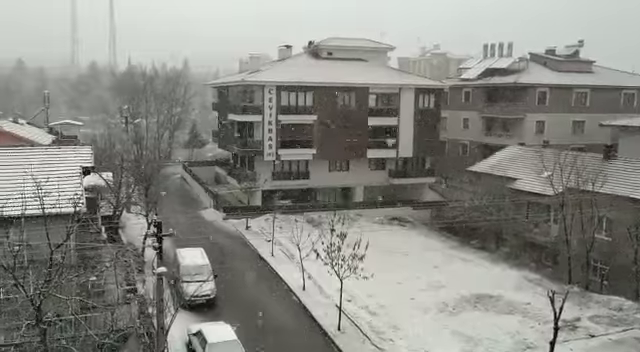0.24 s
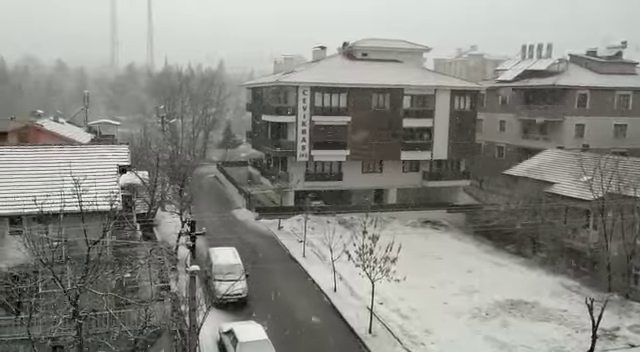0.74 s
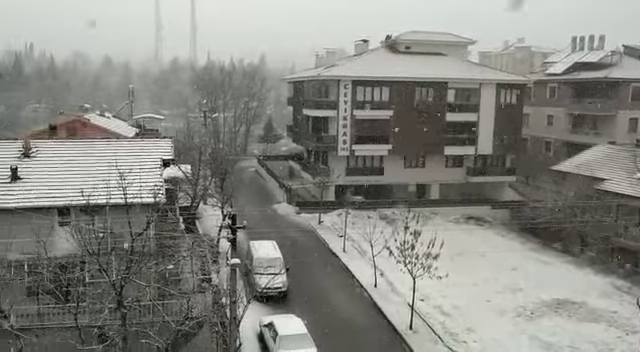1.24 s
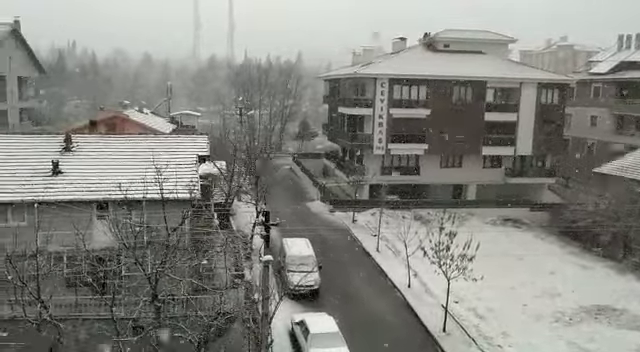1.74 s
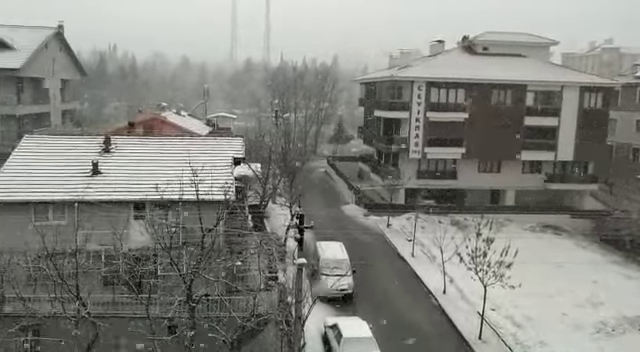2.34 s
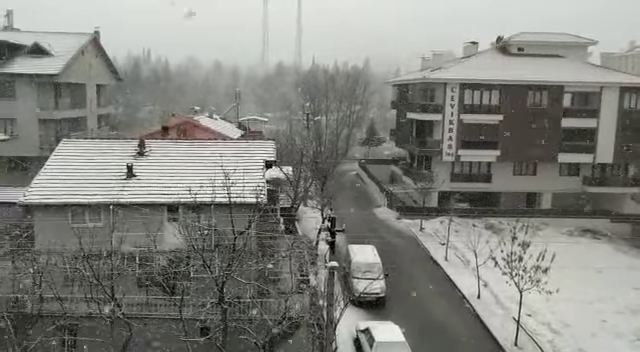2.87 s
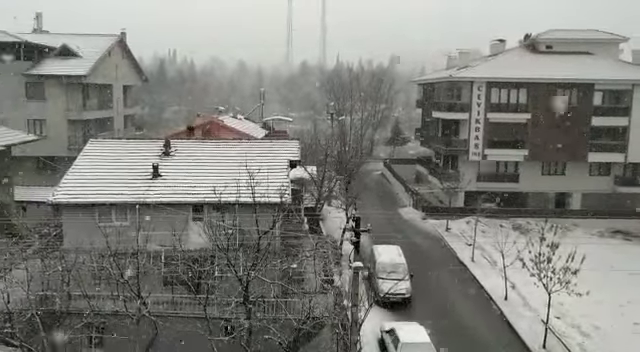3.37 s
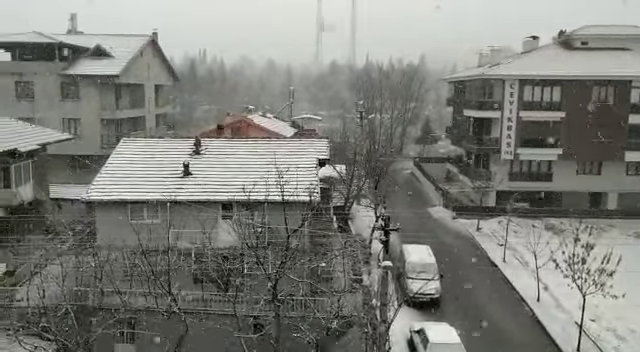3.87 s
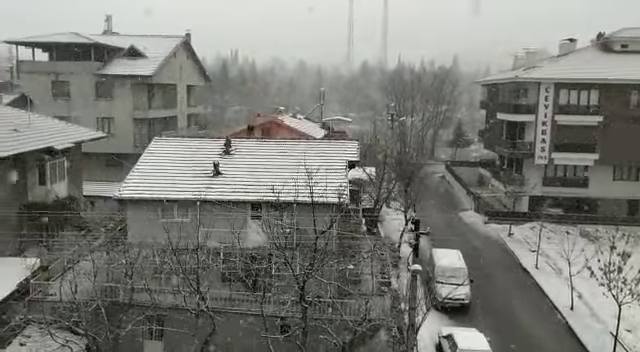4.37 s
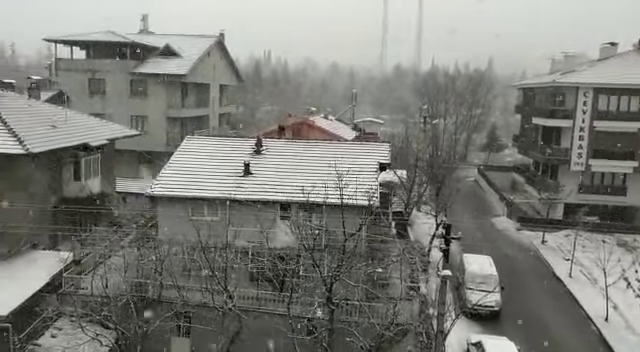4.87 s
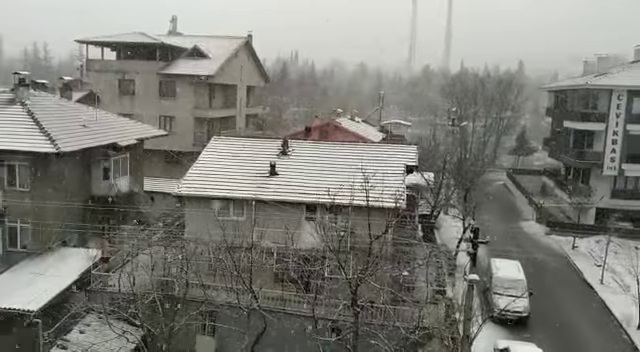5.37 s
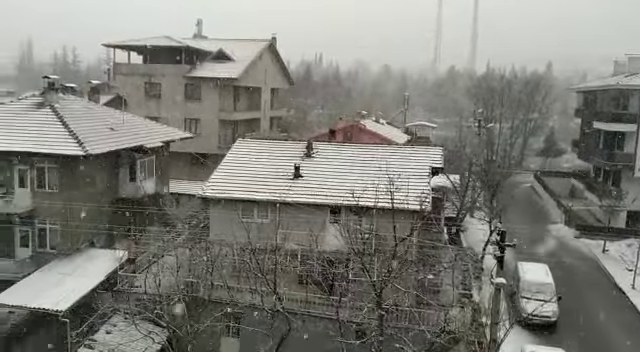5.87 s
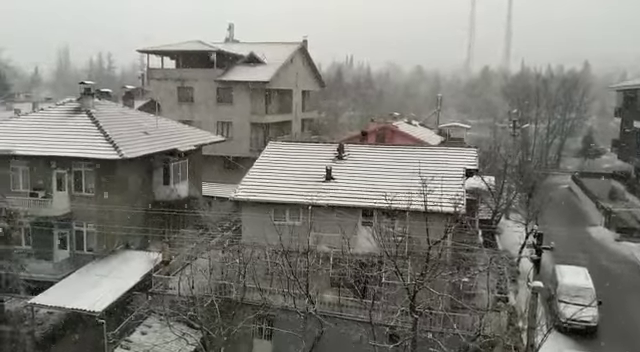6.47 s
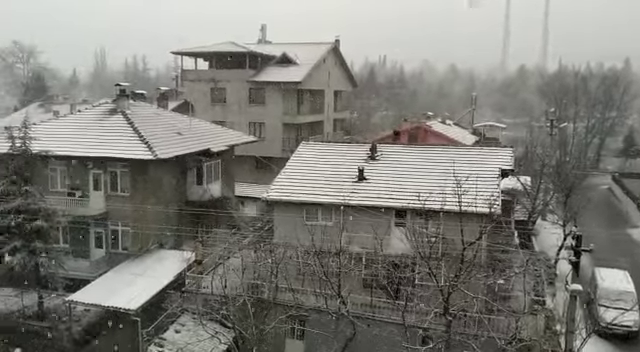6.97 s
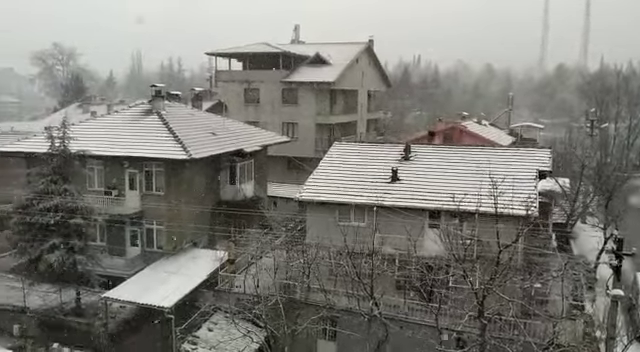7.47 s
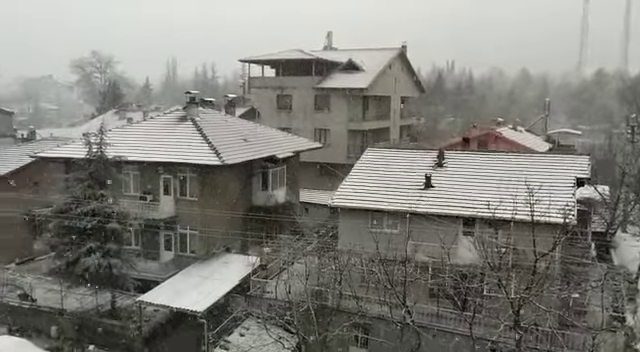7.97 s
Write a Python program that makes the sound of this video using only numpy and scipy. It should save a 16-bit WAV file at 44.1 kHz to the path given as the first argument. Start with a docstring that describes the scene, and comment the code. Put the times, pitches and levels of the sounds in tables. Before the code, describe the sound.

Wet tyre hiss and low engine boom swell as a car goes by below, then fade hollowly down a slushy residential street.

```python
"""First one hears the boom of an engine and the wet hiss of tyres: a car passes a balcony from left to right.
Harmonic engine orders follow the firing rate, which falls just after the car is abreast; filtered noise and
droplet ticks make the tyres, combed by wall echoes. Two ports of a phone hear them with a lag set by bearing.
As the car goes off between snowy houses its echo returns along the slushy street and hollows the hiss.
A second engine hums far off, a damped mode gives one dull knock, and light air rumbles at the ports."""
import sys
import numpy as np
from scipy import signal
from scipy.fft import rfft, irfft, next_fast_len
from scipy.io import wavfile
from scipy.ndimage import map_coordinates

SR = 44100
rng = np.random.default_rng(int(sys.argv[2]) if len(sys.argv) > 2 else 0)


def wav_out(sig):
    """Save sig, one row per channel (or a flat mono array), as 16-bit PCM at SR to the path in sys.argv[1]."""
    wavfile.write(sys.argv[1], SR, np.round(np.clip(np.atleast_2d(sig).T, -1, 1) * 32767).astype(np.int16))


N = 362061

# Engine speed, pulling and then coasting: (time [s], firing rate [Hz])
FIRING_RATE = [(0, 58.54), (.42, 63), (1.0, 75.66), (1.39, 80.26), (1.83, 80.16), (2.1, 77.4), (2.26, 71.9),
               (2.65, 59.5), (2.81, 52.47), (3.08, 50.24), (4.66, 52.63), (5.8, 52.05), (6.3, 50.4),
               (7.4, 48.1), (8.21, 43.55)]
# Exhaust boom before its waver: (time [s], level [dB])
BOOM_LEVEL = [(0, -27), (.9, -30), (1.03, -38.5), (1.13, -28.5), (1.35, -26.5), (1.45, -42), (1.95, -31.5),
              (2.45, -26.5), (3.35, -30), (4.85, -43.5), (5.3, -53.5), (5.8, -45.5), (6.15, -44.5),
              (6.8, -50), (7.3, -47), (8.21, -53)]
# Engine orders together, sinking while the throttle is shut: (time [s], level [dB])
OVERTONE_LEVEL = [(0, -47), (.65, -46), (1.0, -43.5), (1.7, -44.5), (2.1, -46), (2.3, -55), (2.95, -46),
                  (3.35, -41.5), (4.0, -45.5), (4.85, -47), (5.25, -54.5), (5.9, -57), (6.35, -51.5),
                  (6.9, -56), (7.4, -51.5), (8.21, -61)]
# Third order, droning at top revs, again as the revs fall, and more softly from 3.4 to 4.4 s:
# (time [s], level [dB])
DRONE_LEVEL = [(0, -66), (1.25, -62), (1.65, -58.5), (1.88, -46), (2.05, -62), (2.25, -47.5), (2.6, -47.5),
               (2.95, -67), (3.4, -53), (4.4, -53), (5.2, -66.5), (6.3, -56), (7.3, -62), (8.21, -71)]
# Orders other than the third, under load: (multiple of the firing rate [1], relative level [dB])
PULLING_ORDERS = [(.5, -5.5), (2, 2.5), (2.5, -17), (3.5, -19), (4, -8), (4.5, -30), (5, -17), (6, -18.5)]
# The same when cruising: (multiple of the firing rate [1], relative level [dB])
CRUISING_ORDERS = [(.5, -3), (2, 1.5), (4, -17), (6, -16)]
# Resonances that the orders sweep through: (centre [Hz], width [Hz], level [dB])
SILENCER_MODES = [(249, 23, 4.5), (381, 41, -3.5)]
# The driver lifts off: (start [s], end [s])
LIFT_OFF = (2.19, 3)
FADES_DB = 2.5  # the engine orders waver in level together


def engine(wobble=0.00088, boom_rough_db=2.0, far_rough_db=-1.0, rough_db=2.0):
    """Harmonic synthesis: exhaust pulses boom at the firing rate; unequal cylinders add half orders."""
    hz, = curves(FIRING_RATE)
    boom_db, = curves(BOOM_LEVEL)
    overtone_db, = curves(OVERTONE_LEVEL)
    drone_db, = curves(DRONE_LEVEL)
    load, = curves([(LIFT_OFF[0], 1), (LIFT_OFF[1], 0)])
    phase = 2 * np.pi * np.cumsum(hz * (1 + wobble * walk(10))) / SR

    orders = np.sqrt(2) * undb(drone_db) * np.sin(3 * phase)
    for table, share in ((PULLING_ORDERS, load), (CRUISING_ORDERS, 1 - load)):
        stack = np.zeros(N)
        for multiple, db in table:
            level = undb(db + rough_db * np.tanh(walk(9.8)))
            stack += level * np.sin(multiple * phase + 2 * np.pi * rng.random())
        orders = orders + np.sqrt(share) * unit(stack) * undb(overtone_db)
    orders = filtered(orders, silencer)

    # The boom wavers more when the car is far
    distance, _ = position()
    waver_db = far_rough_db * (1 - 1 / distance) * walk(3.24)
    boom = unit(np.sin(phase) * undb(boom_rough_db * walk(13)))
    return boom * undb(boom_db + waver_db) + orders * undb(FADES_DB * walk(7))


def silencer(f):
    """Resonance: each damped mode adds its peak to the direct transmission."""
    gain = 1
    for centre_hz, width_hz, db in SILENCER_MODES:
        gain = gain + undb(db) / (1 + 1j * (f ** 2 - centre_hz ** 2) / (f * width_hz))
    return gain


# Tyre spectra, from carcass rumble up to fine mist: (frequency [Hz], relative density [dB per Hz])
RUMBLE_SPECTRUM = [(15, 7.5), (35, 7), (70, 6.5), (120, -1.5), (250, 5), (330, -0.5), (450, -11), (700, -6),
                   (1500, -26)]
ROAR_SPECTRUM = [(200, -10.5), (420, -3), (650, -1), (850, 1.5), (1050, 6), (1350, 2.5), (1800, -12),
                 (3500, -20.5)]
SWISH_SPECTRUM = [(800, -23), (1200, -2.5), (1500, 1.1), (2000, 3), (2800, 1.5), (3400, 3), (4500, -1.5),
                  (6000, -5.5), (9000, -25)]
SPRAY_SPECTRUM = [(1500, -23), (3000, -12.5), (4500, -3.5), (6200, 3.5), (8700, 3), (9400, 1.5),
                  (10200, -5.5), (11000, -15), (14000, -50)]
MIST_SPECTRUM = [(3000, -10), (7000, 6), (10000, 10), (11500, 7.5), (13000, 5), (14500, -10.5)]
# How each carries: (level abreast [dB], loss per doubling of distance [dB],
# gain straight behind and equal loss straight ahead [dB])
RUMBLE_REACH = (-42, 5.3, -3.5)
ROAR_REACH = (-43.5, 3.1, 3)
SWISH_REACH = (-34.5, 4.2, 1.48)
SPRAY_REACH = (-32.5, 9.5, 3)
MIST_REACH = (-41, 12.4, -2.6)
# Wetter and drier stretches of road:
# (time [s], half length [s], extra roar [dB], extra swish [dB], extra spray [dB], extra mist [dB])
WET_STRETCHES = [(1.194, 0.44, 0.5, 1.5, 3, 1.5), (1.16, 0.059, -0.5, 1.5, 1.5, 4),
                 (1.61, 0.36, -0.5, 2, 0.4, 1.5), (1.979, 0.38, 1, -1.5, -4, 3.5),
                 (2.36, 0.31, 2.5, 2.5, 1.7, -0.5), (2.75, 0.13, .5, -0.5, 2.5, -1),
                 (3.08, 0.15, 1.5, -2, 2, -1), (3.95, 0.35, 0.5, 1, -0.5, -1),
                 (4.692, 0.15, 0.5, -1.5, -2.5, -5), (5.542, 0.26, 0, 1, 1.1, -2),
                 (6.426, 0.32, -0.5, 0.5, 1, 12), (7.02, 0.24, -0.5, 1, -3, -9),
                 (7.42, 0.23, -1.5, 2, 1, 21.5), (7.767, 0.2, -0.5, 2, -3.5, -14)]
# Spray hisses fore and aft: loss side-on, and width of that lull as a sine of the bearing
SIDE_ON_DB, SIDE_ON_WIDTH = 2.5, 0.7


def tyres():
    """Directional radiation with distance loss: carcass, tread and thrown water each carry differently.

    Rows 0-3 come straight from the four wheels, rows 4-5 by way of the house fronts."""
    _, bearing = position()
    side_on_db = SIDE_ON_DB * np.exp(-(bearing / SIDE_ON_WIDTH) ** 2)
    wet_db = sum(np.outer(extra_db, swell(at_s, half_s)) for at_s, half_s, *extra_db in WET_STRETCHES)
    reaches = (ROAR_REACH, SWISH_REACH, SPRAY_REACH, MIST_REACH)
    roar_db, swish_db, spray_db, mist_db = wet_db + [carried(*reach) for reach in reaches]
    sound = rush(RUMBLE_SPECTRUM, carried(*RUMBLE_REACH), surge_db=-0.5, surge_rate=12)
    sound = sound + rush(ROAR_SPECTRUM, roar_db, surge_db=3.0, surge_rate=16)
    sound = sound + rush(SWISH_SPECTRUM, swish_db, surge_db=3.5, surge_rate=24, drops=0.34, drop_rate=540)
    sound = sound + rush(SPRAY_SPECTRUM, spray_db - side_on_db,
                         surge_db=3.0, surge_rate=26, drops=0.47, drop_rate=700)
    return sound + rush(MIST_SPECTRUM, mist_db, surge_db=3.0, surge_rate=16, drops=0.42, drop_rate=1000)


CLUMP_DB, CLUMP_RATE = 1.08, 45  # clumps of slush jolt all wheels together: level swing, turns a second


def rush(spectrum, level_db, surge_db, surge_rate, drops=0., drop_rate=0, count=6):
    """Turbulent noise plus random impacts: slush flutters on each path and droplets tick."""
    noise = rng.standard_normal((count, N), dtype=np.float32)
    if drops:
        hits = int(count * drop_rate * N / SR)
        sizes = unit(rng.laplace(size=hits)) * np.sqrt(SR / drop_rate)
        noise[rng.integers(count, size=hits), rng.integers(N, size=hits)] += drops * sizes
    surge = np.tanh([walk(surge_rate) for _ in range(count)])
    clumps_db = CLUMP_DB * np.tanh(walk(CLUMP_RATE))
    return unit(colour(noise, spectrum) * undb(surge_db * surge)) * undb(level_db + clumps_db)


SPEED_M_S, LANE_M = 9.48, 16.8  # speed, and distance from the balcony to the lane
ABREAST_S = 1.965  # moment at which the car is level with the balcony


def position(early=0):
    """Plane geometry: distance in lane distances, and sine of the bearing (-1 coming, +1 going)."""
    along = SPEED_M_S * (np.arange(N) / SR + early - ABREAST_S)
    distance = np.hypot(along, LANE_M)
    return distance / LANE_M, along / distance


HIDDEN_S, HIDDEN_DB_PER_S = 7.72, 7.5  # the houses begin to screen the tyres, which fade at this rate


def carried(abreast_db, fall_db, behind_db=0):
    """Spreading loss, directivity and screening: the level in dB of a sound from the tyres."""
    distance, bearing = position()
    screened_db = HIDDEN_DB_PER_S * np.maximum(np.arange(N) / SR - HIDDEN_S, 0)
    return abreast_db - fall_db * np.log2(distance) + behind_db * bearing - screened_db


END_ON_LAG_MS = 0.5123  # lag between the ports for a sound from far along the street


def at_ports(x, early=0, facing=1):
    """Time difference of arrival: the lag follows the bearing; negative facing is the opposite side."""
    _, bearing = position(early)
    half_lag = facing * END_ON_LAG_MS * bearing * SR / 2000  # samples
    n = np.arange(N)
    return np.array([map_coordinates(x, [n + sign * half_lag], order=3, mode="nearest")
                     for sign in (-1, 1)])


# Balcony echo, whose lag changes with the angle to the car: (time [s], lag [ms])
BALCONY_ECHO = [(0, 2.4), (1.1, 2.23), (2.8, 1.74), (3.7, 3), (5.3, 2.3), (8.21, 2.72)]
# House wall behind the phone, values with the car abreast: (lag [ms], level [dB])
WALL_ECHOES = [(2.05, -15), (3.05, -16.5)]
BALCONY_DB, ECHO_TOP_HZ = -18, 7000  # rough walls return little above this frequency


def with_echoes(heard):
    """Comb filtering: short reflections interfere with the direct hiss, and the combs slide with the car."""
    distance, _ = position()
    n = np.arange(N)

    def late(ms):
        return np.array([np.interp(n - ms * SR / 1000, n, x) for x in heard])

    echoes = undb(BALCONY_DB) * late(*curves(BALCONY_ECHO))
    for lag_ms, db in WALL_ECHOES:
        echoes = echoes + undb(db) / distance * late(lag_ms / distance)
    return heard + filtered(echoes, lambda f: 1 / np.hypot(1, (f / ECHO_TOP_HZ) ** 2))


# Tyre sound scattered by the houses: (frequency [Hz], level [dB])
SCATTERED_COLOUR = [(200, -4), (700, -5), (1300, -9), (1900, -5), (3400, -6.5), (5400, -5.5), (9000, -3)]
# Echo returning along the street: (frequency [Hz], level [dB])
RETURNED_COLOUR = [(200, -1.5), (700, -3.5), (1400, -8), (2300, -2), (4400, -9), (6000, -8), (9000, -9)]
RETURN_SHARE = 0.88  # share of the echo's power that returns from behind once the car is far
RETURN_FACING = 0.868  # size of the returning echo's port lag, relative to the car's


def street_echo(a, b, round_trip_s=.05):
    """Diffuse and directed reflection: scatter all round gives way to a hollow return along the street."""
    along = RETURN_SHARE * channelled()
    all_round = colour(from_all_sides(a, b), SCATTERED_COLOUR)
    delayed = np.roll(b, int(round_trip_s * SR))
    from_behind = colour(at_ports(delayed, facing=-RETURN_FACING), RETURNED_COLOUR)
    return np.sqrt(1 - along) * all_round + np.sqrt(along) * from_behind


PORT_SPACING_S = .0005  # travel time of sound between the ports


def from_all_sides(a, b):
    """Diffuse-field coherence: alike at both ports in the bass, unrelated in the treble."""
    def likeness(f):
        return np.sinc(2 * f * PORT_SPACING_S)

    mid = filtered(a, lambda f: np.sqrt((1 + likeness(f)) / 2))
    side = filtered(b, lambda f: np.sqrt((1 - likeness(f)) / 2))
    return np.array([mid + side, mid - side])


# The sound begins to run along the street: (middle of the change [s], time scale [s])
CHANNEL_ONSET = (4.9, 0.48)


def channelled():
    """Guided propagation: rises from 0 to 1 as the car goes off between the houses."""
    at_s, over_s = CHANNEL_ONSET
    return (1 + np.tanh((np.arange(N) / SR - at_s) / over_s)) / 2


# Phase by which the left port leads once the car has gone off along the street: (frequency [Hz], phase [rad])
DEPARTING_PHASE = [(300, 0), (1200, .55), (3500, .55), (5400, 0), (7300, -.3), (9000, 0)]


def phase_turned(heard):
    """Phase shift between the ports: it sets in as the car goes off along the street."""
    def turn(f):
        return np.exp(np.outer([.5j, -.5j], np.interp(f, *np.transpose(DEPARTING_PHASE))))

    return heard + channelled() * (filtered(heard, turn) - heard)


# Balance of the treble: (time [s], left minus right [dB])
TREBLE_BALANCE = [(0, 2.5), (.8, -2.5), (1.3, 3.5), (2.05, -2), (3.0, 3), (3.6, 3), (5.0, -0.5),
                  (6.8, -2.5), (7.4, 2.5), (7.7, -3.5), (8.21, 2)]


def shaded(heard, corner_hz=5500):
    """Acoustic shadowing: the phone's body shades one port's treble as the angle to the car changes."""
    pan_db, = curves(TREBLE_BALANCE)
    treble = filtered(heard, lambda f: 1 / (1 + (corner_hz / f) ** 4))
    return heard + treble * (undb(np.array([pan_db, -pan_db]) / 2) - 1)


# A second engine before its waver: (time [s], firing rate [Hz], peak level [dB])
FAR_ENGINE_COURSE = [(0, 73.4, -69), (3.5, 72.9, -50), (5.9, 73.5, -53), (6.3, 75.4, -53),
                     (7.3, 74.5, -55.5), (7.75, 76, -54.5), (8.21, 78.5, -61)]


def far_engine(second_db=-4, waver_db=3.0):
    """Harmonic synthesis: a distant engine hums on its firing rate and the octave."""
    hz, db = curves(FAR_ENGINE_COURSE)
    phase = 2 * np.pi * np.cumsum(hz) / SR
    hum = 0
    for multiple, order_db in ((1, 0), (2, second_db)):
        hum = hum + undb(db + order_db + waver_db * walk(6)) * np.sin(multiple * phase)
    return hum


# One dull knock: (frequency [Hz], 60 dB decay time [s], level at onset [dB], thud relative to mode [dB])
KNOCK_MODE = (404, 0.16, -43, -7)
KNOCK_S = 5.868  # onset


def knock():
    """Damped vibration: a mode decays exponentially with a dull noise thud around it."""
    hz, t60_s, db, thud_db = KNOCK_MODE
    age = np.arange(N) / SR - KNOCK_S
    fade = (age > 0) * undb(db - 60 * np.abs(age) / t60_s)
    thud = unit(filtered(rng.standard_normal(N), lambda f: 1 / (1 + (f / hz - hz / f) ** 2)))
    return fade * (np.sin(2 * np.pi * hz * age) + undb(thud_db) * thud)


# Light air at the ports: (frequency [Hz], relative density [dB per Hz])
BREEZE_SPECTRUM = [(12, 3), (32, 6), (60, 0), (120, -5), (400, -46)]
# Stronger and weaker puffs: (time [s], half length [s], relative level [dB])
PUFFS = [(0.778, 0.13, 15), (1.42, .1, -6), (3.505, 0.29, 16), (6.4, .2, 6)]


def breeze(db=-49, gust_db=2):
    """Turbulent pressure noise: light air rumbles at each port independently, with common puffs."""
    puffs_db = sum(extra_db * swell(at_s, half_s) for at_s, half_s, extra_db in PUFFS)
    rumble = colour(rng.standard_normal((2, N)), BREEZE_SPECTRUM)
    return unit(rumble * undb(puffs_db + gust_db * walk(1.02))) * undb(db)


def undb(db):
    """Logarithmic level: decibels to amplitude gain."""
    return np.exp(np.asarray(db) * (np.log(10) / 20))


def curves(table):
    """Linear interpolation: the columns of a table at every sample."""
    s, *columns = np.transpose(table)
    return [np.interp(np.arange(N) / SR, s, c) for c in columns]


def unit(x):
    """Power normalisation: scale to rms 1."""
    return x / np.sqrt(np.mean(x ** 2))


def filtered(x, gain_at):
    """Linear filtering: multiply the spectrum by a gain given as a function of frequency."""
    size = next_fast_len(N + 4096, real=True)
    gain = gain_at(np.maximum(np.fft.rfftfreq(size, 1 / SR), 1)).astype(np.complex64)
    return irfft(rfft(x.astype(np.float32), size) * gain, size)[..., :N]


def colour(x, points):
    """Spectral shaping: filter by (Hz, dB) points joined on a log-frequency axis."""
    hz, db = np.transpose(points)
    return filtered(x, lambda f: undb(np.interp(np.log(f), np.log(hz), db)))


def walk(rate):
    """Band-limited random modulation: spread near 1 and about rate turns a second."""
    steps = rng.standard_normal(2048) * np.sqrt(3 / 2)
    return np.interp(np.linspace(0, rate * N / SR, N), np.arange(len(steps)), steps)


def swell(at_s, half_s):
    """Gaussian envelope: a smooth rise to 1 and fall around a moment."""
    return np.exp(-((np.arange(N) / SR - at_s) / half_s) ** 2)


def scene(wheelbase_s=0.54):
    """Superposition of sources: wheels pass each bearing in turn, so the hiss is widest when closest."""
    *wheels, echo_a, echo_b = tyres()
    offsets = wheelbase_s * np.linspace(-.5, .5, len(wheels))
    direct = sum(at_ports(wheel, early) for wheel, early in zip(wheels, offsets)) / 2
    hiss = undb(-2.37) * with_echoes(direct) + street_echo(echo_a, echo_b)
    return shaded(phase_turned(hiss)) + engine() + far_engine() + breeze() + knock()


# Colour of the ports: (frequency [Hz], left level [dB], right level [dB])
PORT_COLOUR = [(300, .2, -.2), (850, -.7, .3), (1200, 0, 0), (1850, 2.3, -.7), (2130, 0, -1.8),
               (2450, 2, -.7), (2900, 2.2, -1.2), (4300, -.5, -1), (6200, 3, -.8), (7200, 3.3, 2.8),
               (8100, 8.5, 7), (8700, 11, 3.5), (9400, 8.5, -2), (10600, 3, -2), (14500, 3, -5)]
CUT_HZ = 14400


def record(dry):
    """Cavity resonance and low-pass filtering: each port rings in the treble, and the top is cut steeply."""
    hz, *sides = np.transpose(PORT_COLOUR)
    heard = np.array([colour(x, np.column_stack([hz, db])) for x, db in zip(dry, sides)])
    low_pass = signal.ellip(12, .1, 80, CUT_HZ, fs=SR, output="sos")  # 0.1 dB ripple, 80 dB stop band
    return signal.sosfilt(low_pass, heard)


dry = scene()
out = record(dry)
wav_out(out)
```